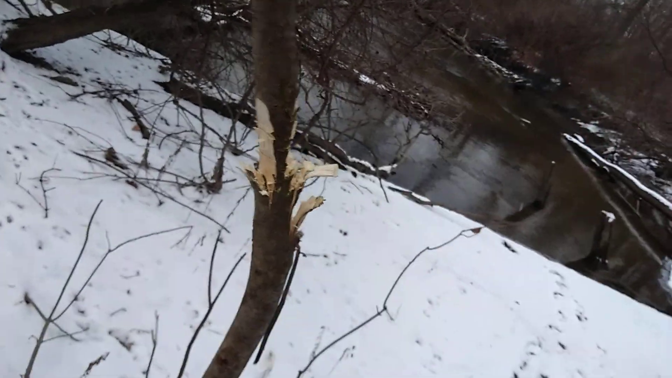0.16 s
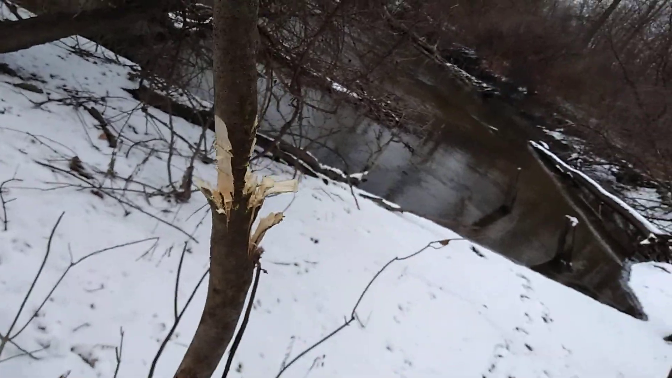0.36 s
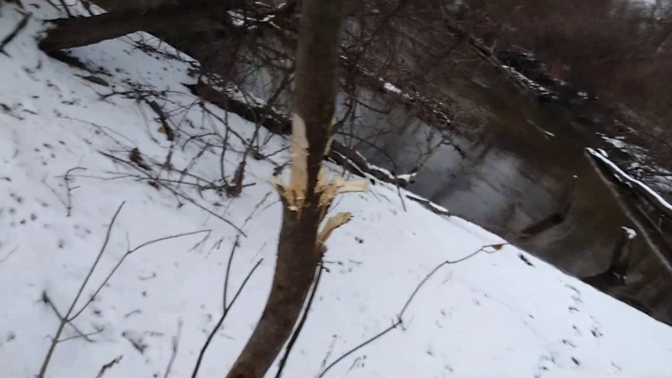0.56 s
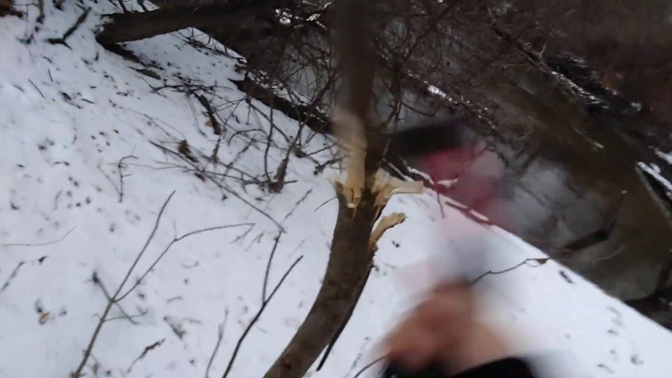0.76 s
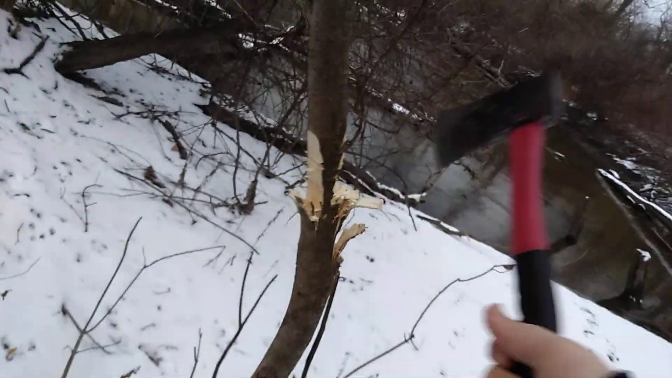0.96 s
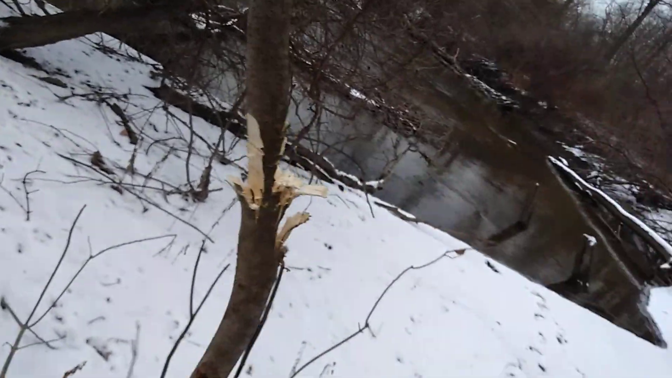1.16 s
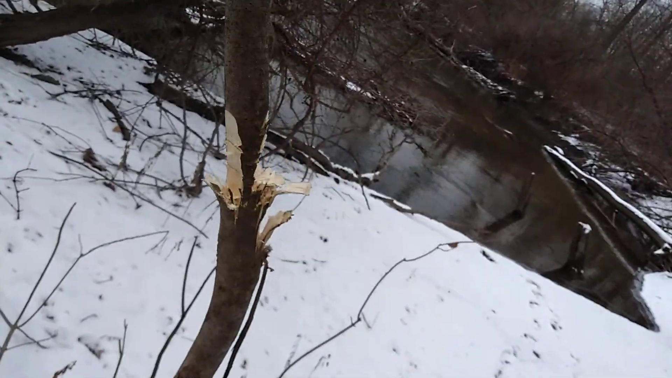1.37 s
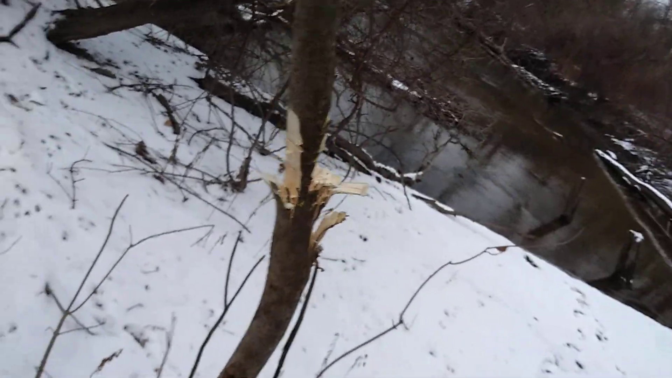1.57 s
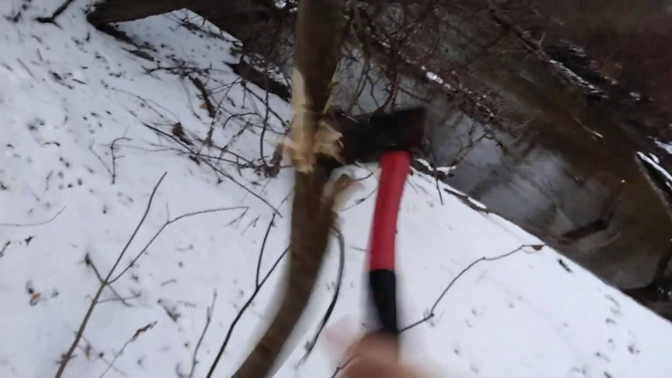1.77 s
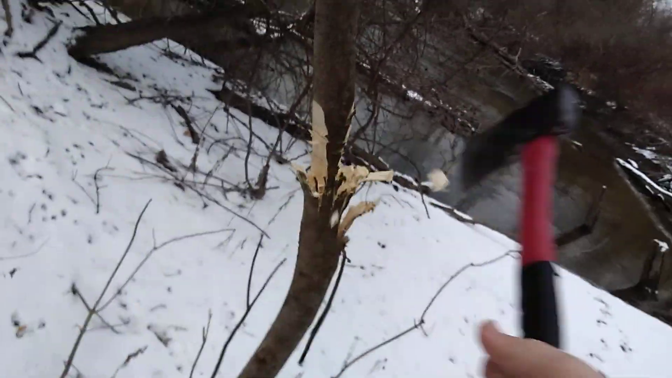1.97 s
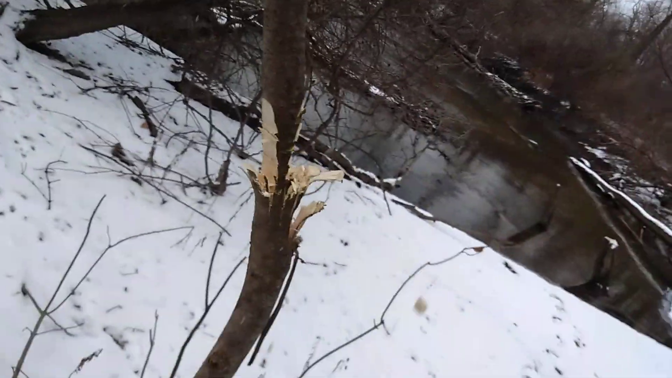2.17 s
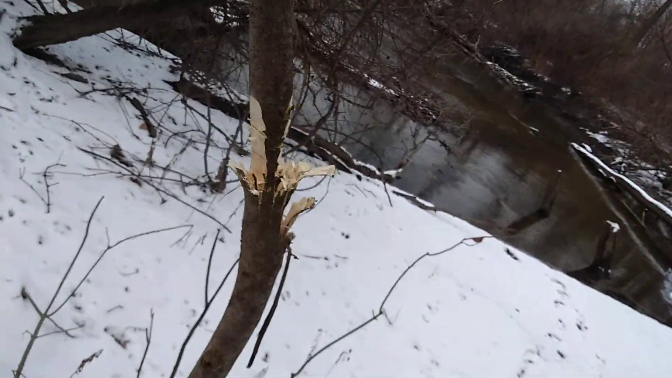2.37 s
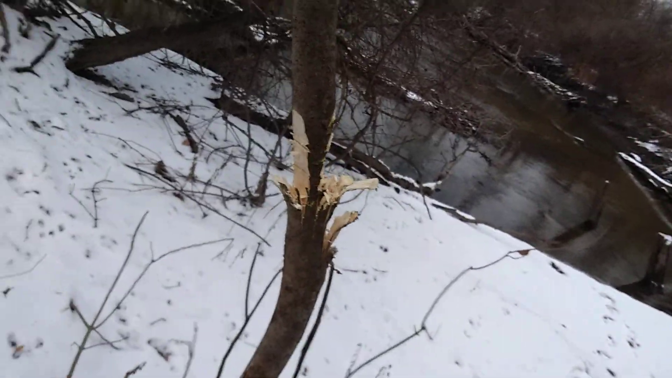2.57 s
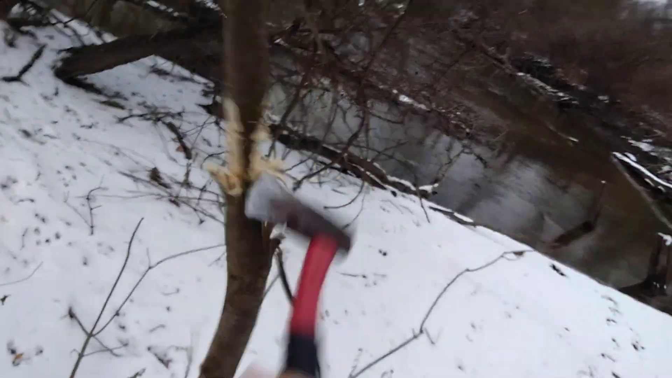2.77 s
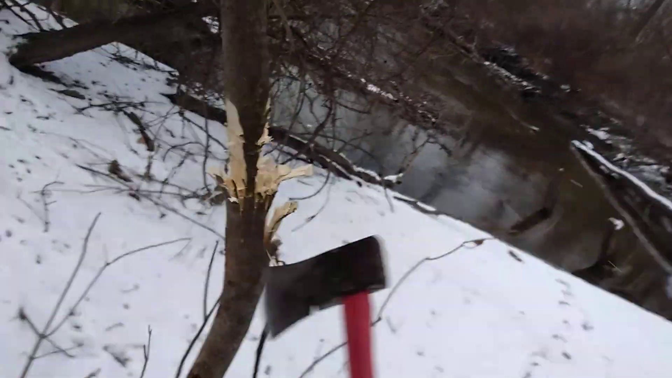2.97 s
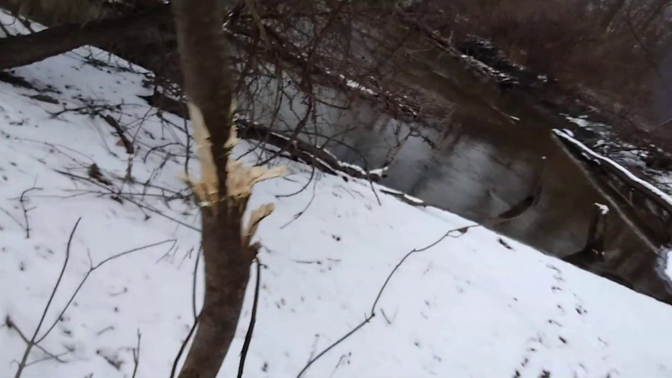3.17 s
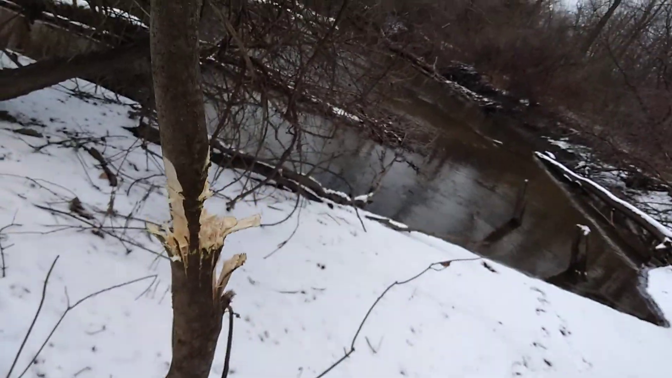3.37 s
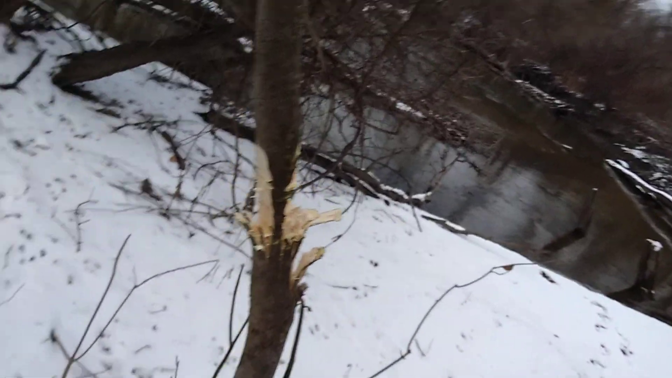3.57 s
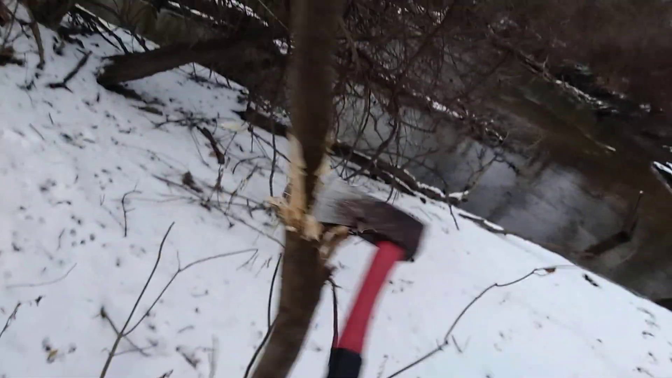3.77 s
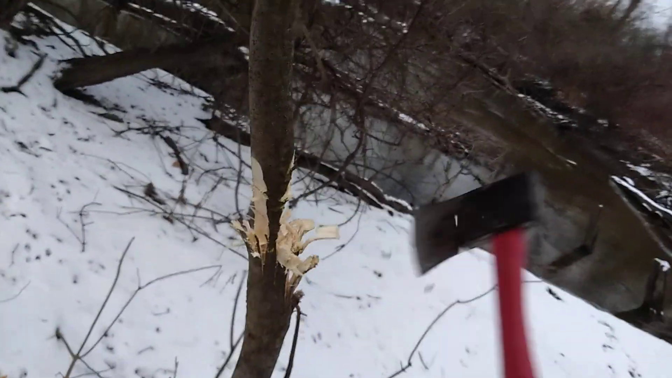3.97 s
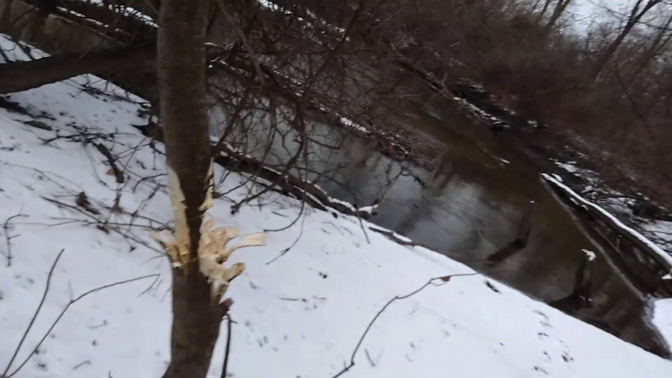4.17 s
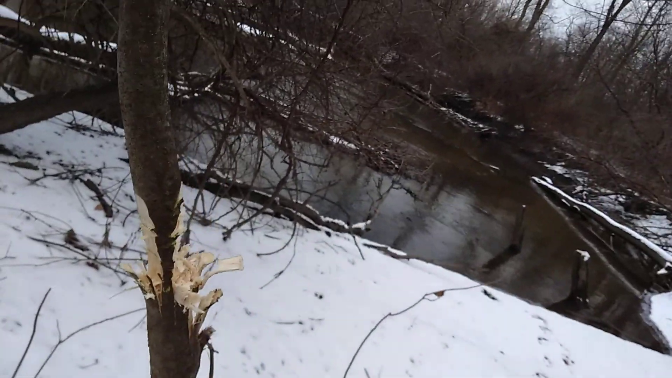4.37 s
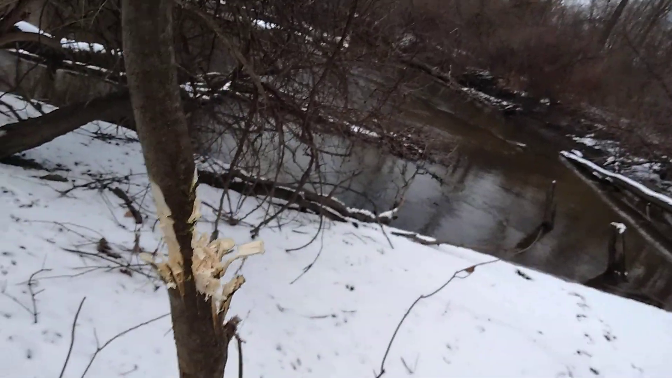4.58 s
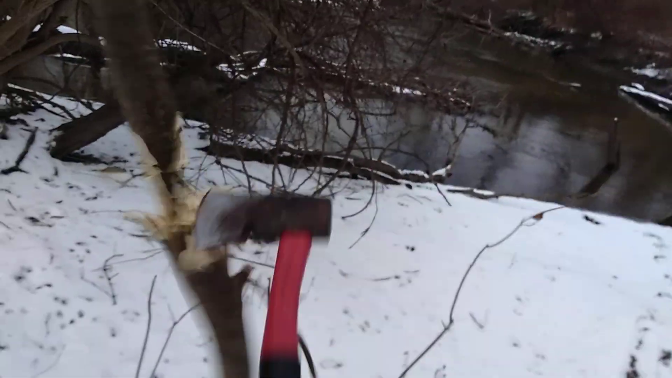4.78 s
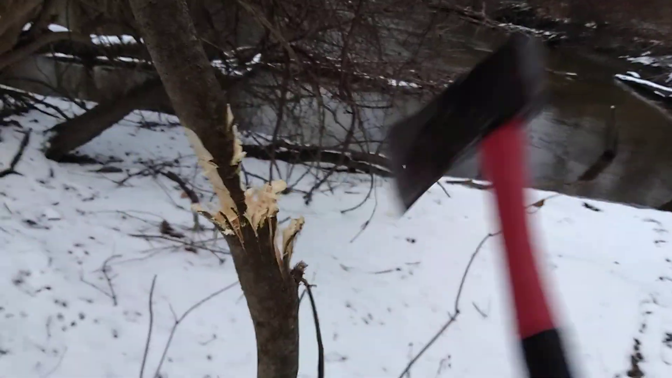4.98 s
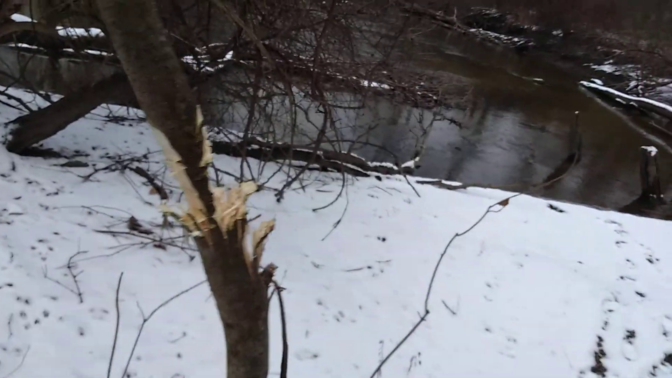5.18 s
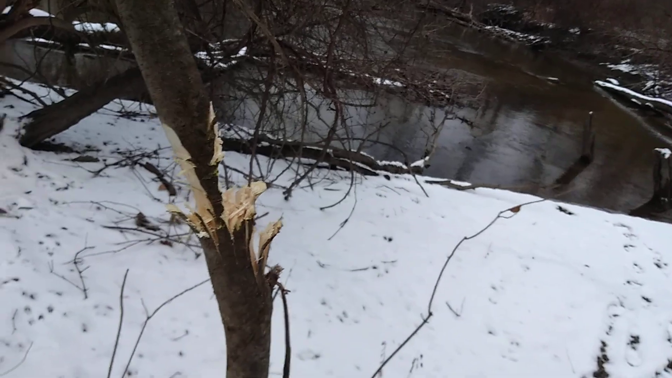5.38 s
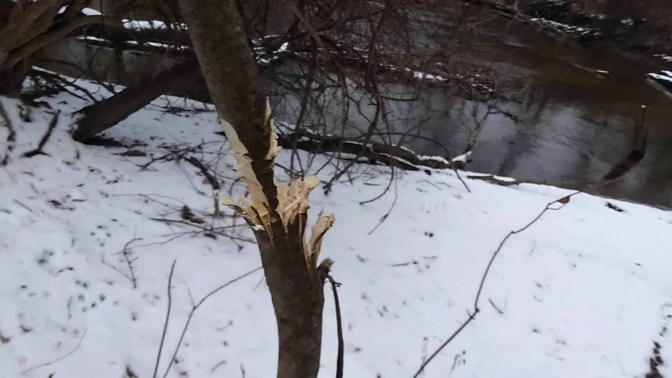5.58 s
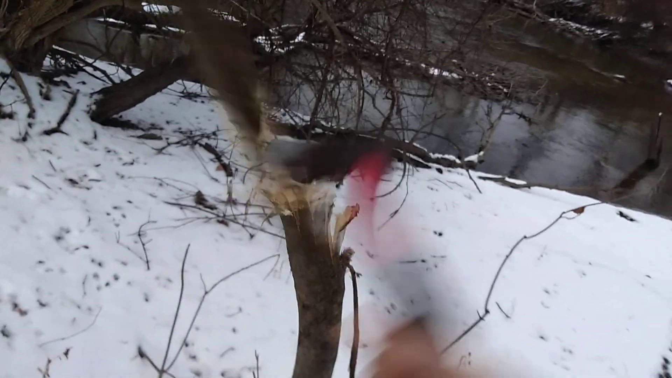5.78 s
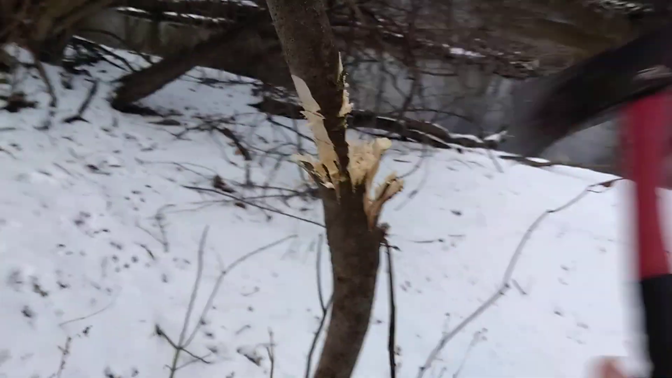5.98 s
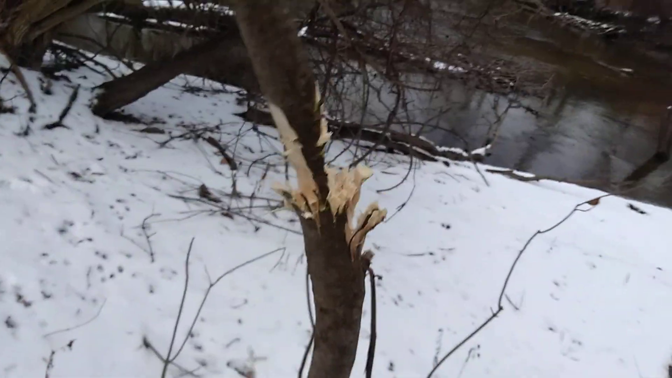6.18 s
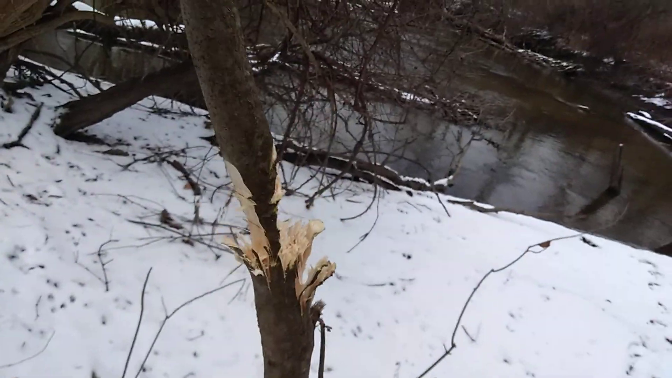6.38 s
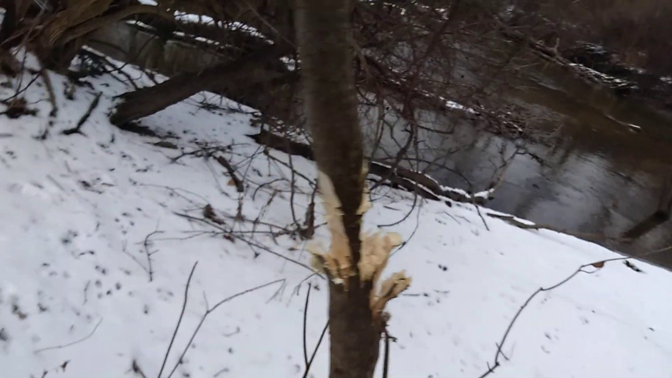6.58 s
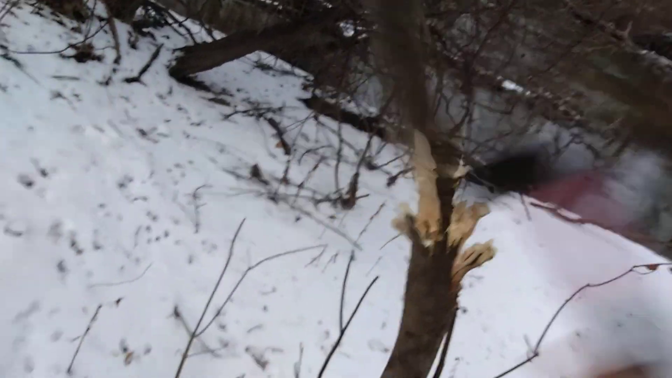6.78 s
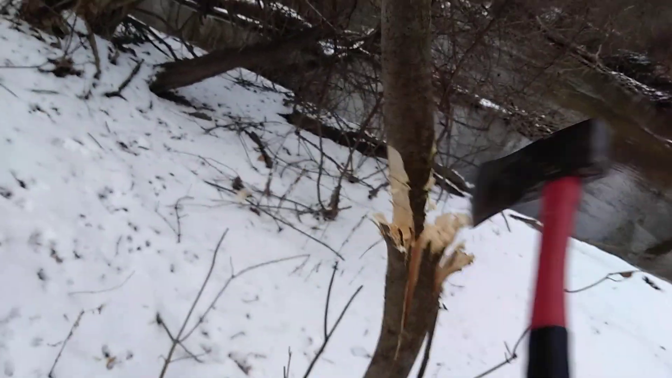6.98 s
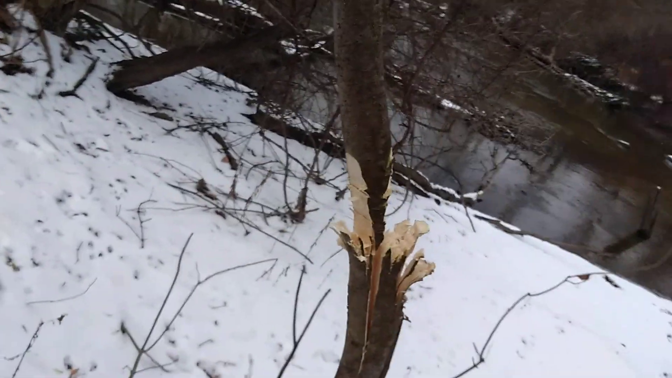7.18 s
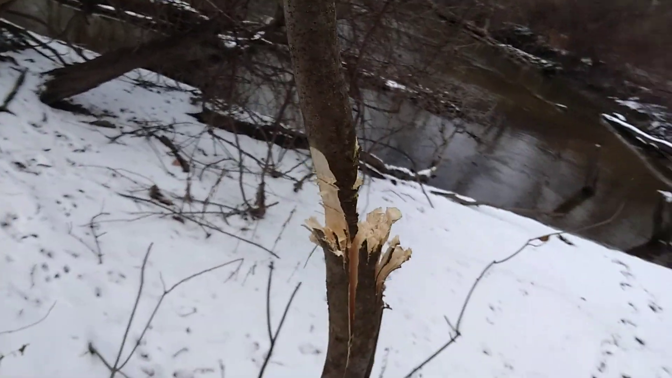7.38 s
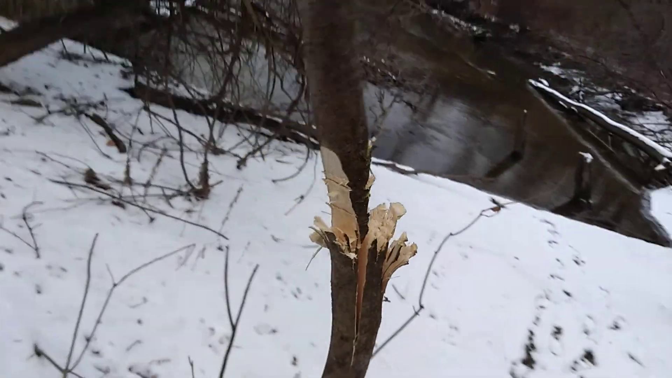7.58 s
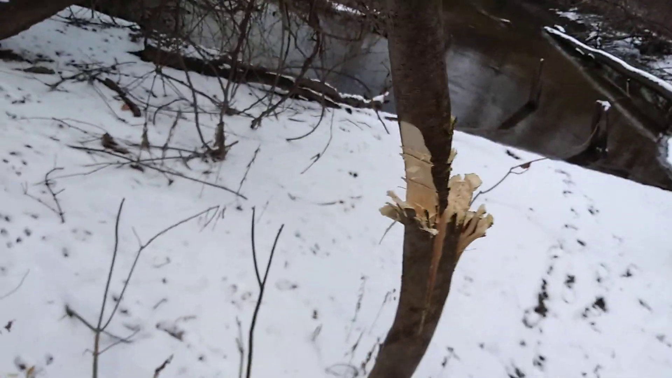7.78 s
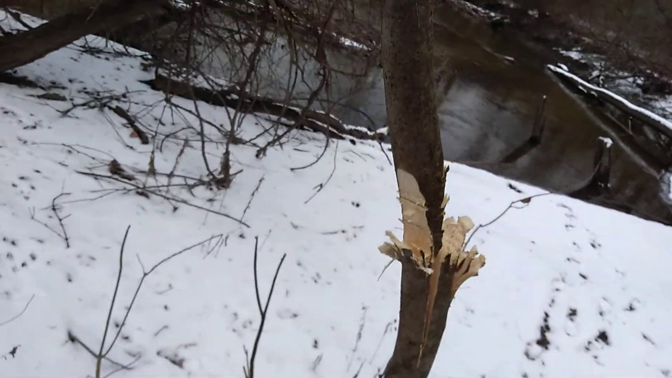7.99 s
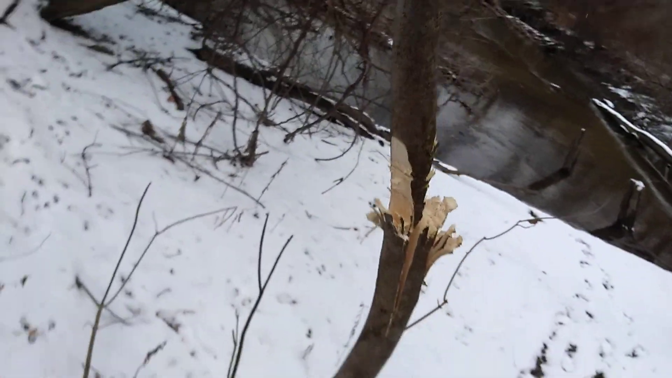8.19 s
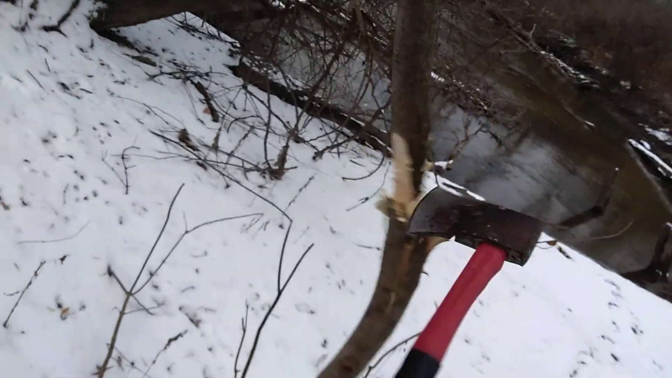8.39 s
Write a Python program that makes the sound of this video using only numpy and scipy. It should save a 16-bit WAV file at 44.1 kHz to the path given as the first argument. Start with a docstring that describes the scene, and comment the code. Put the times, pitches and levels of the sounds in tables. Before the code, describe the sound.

The tail of a chop rattles away at 0 s with a hard tick and small clacks. Hatchet blows then land at about 0.85, 1.8, 2.8, 3.8, 4.8, 5.85, 6.85 and 8.35 s, the last cut off by the end. Each is a bright, crunchy snap with a short dry trunk knock and slight low thud, heaviest at 2.8 s; the last two bite hardest. Dry branches rattle in clumps for under a second after each, with ticking twigs and chips, busiest from 2.9 to 5.5 s. Splitting cracks follow the blows from 2.8 to 6.9 s, strongest at 5.92 s, with a faint wavering steel ring. Cloth rustles softly before swings. Around 7.5-8.0 s a boot crunches snow and a sleeve sweeps. Soft low handling bumps, quiet winter air with far rumble, and a thin grainy tree echo surround the close, slightly overloaded phone pickup.

```python
"""First comes the dying rattle of a chop struck just before the start, then eight more hatchet blows.
Each blow is a burst of noise for crushed fibres, plus decaying tones for the ringing trunk and roots.
Splits crack, the dry crown rattles in clumps of noise and tiny tones, and twigs and chips tick and clack.
Filtered noise makes the rustling clothes, the boot in the snow, the hand on the phone and the winter air.
Bare trunks return a thin echo, and the two microphone ports overload softly on the loud parts."""
import sys
import numpy as np
from scipy import signal
from scipy.fft import rfft, irfft, next_fast_len
from scipy.io import wavfile

SR = 44100
rng = np.random.default_rng(int(sys.argv[2]) if len(sys.argv) > 2 else 0)


def wrap_up_sound(samples):
    """Save the sound to the file named by the first command line argument, as 16-bit audio."""
    columns = np.atleast_2d(samples).T
    # keep every value between -1 and 1, then stretch to whole-number steps
    tamed = np.clip(columns, -1, 1)
    steps = np.round(tamed * 32767).astype(np.int16)
    wavfile.write(sys.argv[1], SR, steps)


N = 371763  # samples in the scene

# Levels in the tables are relative: the functions that play them add their own overall levels.
# A t60 is the time a sound takes to fade by 60 dB.

# Hatchet blows, the first just before the start: start_s, bite_level_db, knock_level_db,
# whole_tree_heave_db, struck_slab_pitch_hz, crown_rattle_db, crown_rattle_t60_s
BLOWS = [(-.16, 0, -9, -44, 1340, -20, 0.71), (0.8481, -1.5, -11.5, -35, 1327, -26.5, 0.9),
         (1.8344, 0.5, -12, -36, 1321, -28, 0.52), (2.8198, -2.5, -13.5, -25.5, 908, -23, 0.83),
         (3.791, -1, -12, -32.5, 1289, -23.5, 0.7), (4.8296, -5, -14, -32.5, 899, -21, 0.97),
         (5.8527, -4, -12, -30.5, 1270, -20, 0.42), (6.8584, 5.5, -14, -38, 1349, -20.5, 0.42),
         (8.3468, 5.5, -22.5, -40.5, 901, -21, 0.73)]
# Tone colour of the crushed fibres: frequency_hz, level_db_per_hz
BITE_SPECTRUM = [(100, -24), (500, -6), (1200, -5), (2400, -6), (4700, 8.5), (6500, -8.5), (10000, -10.5),
                 (16000, -16.5)]
# Tone colour of the dull thud: frequency_hz, level_db_per_hz
THUD_SPECTRUM = [(20, -22), (45, -10), (65, 1.5), (110, -1.5), (180, -12), (350, -29.5), (1200, -68)]
# The trunk bends as a whole: pitch_hz, level_db, t60_s
BENDING_MODES = [(167, -2.5, 0.16), (187.3, 0, .16), (271, -8.5, 0.2)]
# The root plate rocks in the ground: pitch_hz, t60_s
ROOTS = (66, .3)


def blows(bite_db=-2, knock_db=2, thud_db=5, bend_db=12.0, roots_db=0, bite_s=.0042, thud_t60=0.23):
    """The edge crushes fibres for a few milliseconds, then trunk and roots take the blow."""
    out, t = np.zeros((2, N)), clock(.5)
    roots_hz, roots_t60 = ROOTS
    for start, bite_level, knock_level, heave, slab_hz, _, _ in BLOWS:
        crush_shape = (1 - fade(t, 0.0004)) * np.exp(-(t / bite_s) ** 2)
        bite = unit(colour(noise(len(t)), BITE_SPECTRUM)) * crush_shape
        add(out, start, undb(bite_level + bite_db) * bite)
        # the trunk's ring is slightly shorter than its free decay
        add(out, start, undb(knock_level + knock_db) * knock(.95, slab_hz))
        thud = unit(colour(noise(len(t)) * fade(t, thud_t60), THUD_SPECTRUM), size=SR // 20)
        ground = thud + rings(t, [(roots_hz, roots_db, roots_t60)], port_phase=2.0)
        bending = rings(t, BENDING_MODES)
        # the heavy parts take a moment to get moving
        slow_start = 1 - fade(t, 0.021)
        add(out, start, undb(heave) * (undb(thud_db) * ground + undb(bend_db) * bending) * slow_start)
    return out


# Clear tones of the trunk; knock() scales the t60: pitch_hz, level_db, free_t60_s
TRUNK_MODES = [(309, -15.5, 0.11), (382, -13.5, 0.071), (493, -13.5, 0.092), (661.6, -10.5, .16),
               (803.7, -7.5, 0.083), (958, -10.5, 0.079), (1339, -6.5, 0.071), (1440, -15.5, 0.14),
               (1620, -10, 0.1), (1798, -8.5, 0.16), (2407, -21.5, 0.36), (2780, -24, 0.18),
               (3180, -24, 0.28), (3840, -24.5, 0.58), (4416, -15.5, 0.15)]
# Dense ring between those tones; knock() scales the t60: frequency_hz, level_db_per_hz, free_t60_s
WOOD_BANDS = [(120, -10.5, 0.11), (248, -5, 0.18), (450, -8.5, 0.17), (780, -2, 0.17), (1400, 3.5, .09),
              (2140, -4.5, .09), (4600, -17, 0.23), (7800, -13, 0.074), (15000, -20.5, 0.042)]


def knock(length, slab_hz, modes_db=2, slab_db=0, slab_t60=.09):
    """The trunk rings: clear tones over a dense, short wooden decay; length scales all but the slab."""
    t = clock(.5)
    hz, white = np.fft.rfftfreq(len(t), 1 / SR), rfft(noise(len(t)))
    log_centres = np.log(np.array(WOOD_BANDS)[:, 0])
    dense = 0
    # overlapping bands of noise, each with its own decay
    for (_, db, t60), share in zip(WOOD_BANDS, np.eye(len(WOOD_BANDS))):
        band = np.interp(np.log(hz + 1), log_centres, share)
        band = band * hz / (hz + 150)  # less bass
        dense = dense + undb(db) * irfft(white * band) * fade(t, t60 * length)
    modes = [(pitch, db, t60 * length) for pitch, db, t60 in TRUNK_MODES]
    tones = rings(t, modes + [(slab_hz, slab_db, slab_t60)])
    return (unit(dense, size=SR // 50) + undb(modes_db) * tones) * (1 - fade(t, 0.0024))


def rings(t, modes, port_phase=1.97):
    """Decaying tones; every contact wakes them at a slightly different pitch and strength."""
    out = 0
    for hz, db, t60 in modes:
        detune, strength, phase = rng.standard_normal(3)
        cycles = hz * (1 + 0.0074 * detune) * t + phase
        angle = 2 * np.pi * cycles + np.array([[port_phase], [0]])
        out = out + undb(db + 2 * strength) * np.sin(angle) * fade(t, t60)
    return out


# The cut splits along the grain: start_s, crack_level_db, knock_level_db
SPLITS = [(2.8396, -20.5, -19.5), (3.8512, -7.5, -61.5), (3.8585, -3, -35.5), (4.8623, -0.5, -29.5),
          (4.881, -5, -36.5), (5.874, 4, -14), (5.894, 3.5, -29.5), (5.9203, 17, -19.5), (5.9325, 4.5, -46),
          (6.9255, 0.5, -24), (6.9398, -3.5, -40)]
# Tone colour of a crack: frequency_hz, level_db_per_hz
SPLIT_SPECTRUM = [(150, -7), (700, -13), (2000, 0), (4000, 6), (7000, -3), (11000, -2.5), (16000, -8.5)]


def splits(crack_db=-9, knock_db=-4, crack_t60=0.018, slab_hz=1325):
    """Fibres let go with a sharp crack that knocks the trunk again."""
    out, t = np.zeros((2, N)), clock(.5)
    for start, crack_level, knock_level in SPLITS:
        crack = unit(colour(noise(len(t)), own_colour(SPLIT_SPECTRUM, 2.4)))
        crack = crack * fade(t, crack_t60) * left_right(0, -7)
        trunk = knock(.6, slab_hz)
        add(out, start, undb(crack_level + crack_db) * crack + undb(knock_level + knock_db) * trunk)
    return out


# Tone colour of the rattling crown, also used for the echo: frequency_hz, level_db_per_hz
CROWN_SPECTRUM = [(200, -20), (600, -12.5), (1100, -10), (1600, -3), (2500, 1.5), (5000, -3), (8000, -1),
                  (11000, -2), (13000, -10), (16000, -12.5)]


def crown(rattle_db=-2.5, twig_db=-3, linger_db=-34, linger_t60=1.1, clump_db=3.0, clump_s=.025):
    """Each blow shakes the dry crown: crackle and tapping twigs come in clumps and die away."""
    out, t = np.zeros((2, N)), clock(1)
    for start, *_, db, t60 in BLOWS:
        crackling = crackle(len(t), rate=1300, spread_db=2.5, grain_t60=0.036)
        scrape = branches(len(t), CROWN_SPECTRUM) * crackling
        rattle = scrape * left_right(0, -2) + undb(twig_db) * twigs(len(t), count=300)
        turns = rng.uniform(-1, 1, size=100)
        clumps = undb(clump_db * np.interp(t / clump_s, np.arange(len(turns)), turns))
        # a quick decay with a faint, longer tail under it
        shaking = (fade(t, t60) + undb(linger_db) * fade(t, linger_t60)) * (1 - fade(t, .015))
        add(out, start, undb(db + rattle_db) * rattle * clumps * shaking)
    return out


def branches(n, spectrum, count=4, colour_db=4.0, sway_db=5.5, sway_s=.03):
    """Several rough surfaces, each with its own colour, grow louder and softer as they sway; rms 1."""
    out = 0
    for _ in range(count):
        turns = rng.standard_normal(size=800)
        sway = np.interp(np.arange(n) / SR / sway_s, np.arange(len(turns)), turns)
        out = out + colour(noise(n) * undb(sway_db * sway), own_colour(spectrum, colour_db))
    return unit(out)


def twigs(n, count, low_hz=1600, high_hz=8500, spread_db=3):
    """Many twigs tap each other, each around its own pitch; higher ones ring shorter; rms 1."""
    t = clock(.03)
    out = np.zeros((2, n + len(t)))
    for when, size, weight in rng.random((count, 3)):
        hz, i = low_hz * (high_hz / low_hz) ** size, int(when * n)
        tap = stick(t, hz, .02 * np.sqrt(low_hz / hz), scatter=.24)
        out[:, i:i + len(t)] += undb(-spread_db * np.log(weight + 0.025)) * tap
    return unit(out[:, :n])


def stick(t, hz, t60, scatter=.05):
    """A dry stick rings in a rough cluster of four tones, with different phases at each port."""
    phases = 2 * np.pi * rng.random((4, 2, 1))
    pitches = hz * (1 + scatter * rng.standard_normal(size=(4, 1, 1)))
    tones = np.sum(np.sin(2 * np.pi * pitches * t + phases), axis=0)
    return tones * fade(t, t60) * (1 - fade(t, 0.0023))


# The clearest ticks of twigs and chips: start_s, tick_peak_db, woody_body_db
TICKS = [(0.0112, -3, -32), (0.2075, -16, -47.5), (0.9191, -25.5, -32), (0.9607, -4.5, -40),
         (1.022, -20, -34), (1.1215, -10.5, -38.5), (1.4413, -29, -53.5), (1.542, -26.5, -59),
         (2.112, -16.5, -59), (2.2367, -17.5, -55.5), (2.4456, -26, -56.5), (2.5305, -32, -65),
         (2.6369, -18, -57), (2.9073, -5, -50), (2.9836, -2.5, -34.5), (3.0545, -9.5, -49),
         (3.0928, -7.5, -42), (3.1289, -13.5, -54), (3.192, -16, -50), (3.2969, -18.5, -56.5),
         (3.3897, -31.5, -65.5), (3.5123, -22.5, -62), (3.9661, 3, -36.5), (4.065, -12.5, -43.5),
         (4.1933, -7.5, -41), (4.357, -10, -48), (4.5137, -20, -53.5), (4.648, -30.5, -55.5),
         (4.9, -0.5, -28.5), (5.005, -22, -28.5), (5.0931, -3.5, -34.5), (5.1572, -13, -49.5),
         (5.2098, -15.5, -39), (5.239, -1.5, -33.5), (5.2685, -9.5, -41), (5.3147, -21, -38.5),
         (5.3737, -11, -49), (5.5364, -18.5, -46), (6.0268, 0.5, -49), (6.1118, -3, -52),
         (6.1874, -15, -50), (6.2415, -28, -52.5), (6.3617, -26.5, -52), (7.5021, -28.5, -71),
         (7.5977, -16, -44)]
# Tone colour of the hard contact: frequency_hz, level_db_per_hz
TICK_SPECTRUM = [(2000, -32), (5000, -14.5), (8000, 1), (10000, 5.5), (12500, -6.5), (16000, -15.5)]
# Tone colour of the woody body: frequency_hz, level_db_per_hz
TWIG_SPECTRUM = [(400, -23.5), (1200, -13.5), (2000, -5.5), (3200, 2), (6000, 3), (9000, -6.5),
                 (16000, -14)]


def ticks(tick_db=-6, body_db=5, bounce_s=0.0067, bounce_db=-6, tail_db=-24, tail_t60=0.18, contact_t60=.003):
    """A hard little contact, a weaker rebound just after it, and a short shiver of the twig."""
    out, t = np.zeros((2, N)), clock(0.27)
    for start, peak, body in TICKS + stray_ticks():
        since_bounce = t - bounce_s * rng.uniform(.8, 1.2)
        rebound = (since_bounce > 0) * fade(abs(since_bounce), contact_t60)
        contact = fade(t, contact_t60) + undb(bounce_db) * rebound
        grains = crackle(len(t), rate=500, spread_db=2.5, grain_t60=0.013)
        shiver = undb(tail_db) * fade(t, tail_t60) * grains
        # rough bark catches in many tiny slips of equal strength
        slips = np.sign(noise(len(t)))
        tick = colour(slips * (contact + shiver), own_colour(TICK_SPECTRUM, 0.94))
        twig_shape = contact + 2 * shiver + 0.52 * fade(t, 0.098)
        twig = colour(noise(len(t)) * twig_shape, own_colour(TWIG_SPECTRUM, 4))
        add(out, start, undb(peak + tick_db) * tick / abs(tick).max() * left_right(0, -11))
        add(out, start, undb(body + body_db) * unit(twig, size=SR // 100) * left_right(0, -2))
    return out


def stray_ticks(count=5, scatter_db=4, settle_s=.7, settle_db_per_s=44.5, peak_db=-20.5, body_db=-40):
    """Chance contacts while the tree settles, tending weaker the later they come; rows like TICKS."""
    rows = []
    for start, *_ in BLOWS:
        for k, (when, hard, woody) in enumerate(rng.random((count, 3))):
            late = settle_s * (k + when) / count
            drop = settle_db_per_s * late
            peak = peak_db - drop + scatter_db * (2 * hard - 1)
            body = body_db - drop + scatter_db * (2 * woody - 1)
            rows.append((start + late, peak, body))
    return rows


# Sticks and chips knock together: start_s, level_db, pitch_hz
CLACKS = [(0.043, -34.5, 1510), (0.079, -38, 1500), (0.126, -42.5, 1465), (1.018, -30.5, 2400),
          (1.052, -39, 1477), (3.033, -30.5, 1480), (3.285, -45.5, 793), (3.625, -46, 1990),
          (3.655, -43.5, 1850), (5.001, -30, 1360), (7.039, -43.5, 1648), (7.595, -39, 1082)]
# The axe head rings as it wrenches free: start_s, level_db, pitch_hz, t60_s
STEEL = [(5.932, -42, 1333, 0.77)]


def clacks(clack_db=-1, clack_t60=.125, stick_share=0.074, steel_width_hz=45):
    """Hollow notes of thicker sticks, and the wavering ring of the freed blade."""
    out, t = np.zeros((2, N)), clock(0.47)
    for start, db, hz in CLACKS:
        add(out, start, undb(db + clack_db) * hollow(t, hz, clack_t60, stick_share * hz))
    for start, db, hz, t60 in STEEL:
        add(out, start, undb(db) * hollow(t, hz, t60, steel_width_hz))
    return out


def hollow(t, hz, t60, width_hz):
    """A resonance fed by rough rubbing: a narrow band of noise whose level wavers as it fades."""
    bins = np.fft.rfftfreq(len(t), 1 / SR)
    resonance = 1 / (1 + ((bins - hz) / width_hz) ** 2)
    band = irfft(rfft(noise(len(t))) * resonance, len(t))
    return unit(band) * fade(t, t60) * (1 - fade(t, 0.0092)) * left_right(0, -4)


# Jacket and brushwood rustle as the arm moves; length runs up to the release: start_s, length_s, level_db
RUSTLES = [(0.617, 0.092, -54), (1.426, 0.082, -58), (1.622, 0.03, -61.5), (2.72, 0.13, -54.5),
           (3.501, .18, -56.5), (4.772, 0.045, -44), (5.509, .1, -56), (6.448, 0.043, -56),
           (6.622, 0.047, -52.5), (7.55, 0.13, -48), (8.254, 0.11, -54)]
# Tone colour of the cloth: frequency_hz, level_db_per_hz
CLOTH_SPECTRUM = [(100, -9), (400, -14.5), (800, -9), (1600, 1.5), (3500, -3.5), (6000, 5.5), (10000, -3.5),
                  (13000, -8.5), (16000, -5.5)]


def rustle(rustle_db=1, scrape_db=-5, attack_s=0.014, sag_db=-5, release_s=0.049):
    """Cloth and brushwood slide in dense small slips; each movement catches, eases and stops."""
    t, level = np.arange(N) / SR, 0
    for start, length, db in RUSTLES:
        corners = start + np.array([0, attack_s, length, length + release_s])
        level = level + undb(db) * np.interp(t, corners, [0, 1, undb(sag_db), 0])
    slips = branches(N, CLOTH_SPECTRUM, count=3, colour_db=5.5, sway_db=3.5)
    scrapes = undb(scrape_db) * twigs(N, count=1400)
    return undb(rustle_db) * level * (slips + scrapes) * left_right(2, -3)


# A sleeve sweeps across the jacket: start_s, length_s, level_db
SWEEPS = [(7.69, 0.37, -41), (7.79, 0.11, -37.5), (7.85, 0.11, -44.5)]
# Tone colour of the sliding sleeve: frequency_hz, level_db_per_hz
SLEEVE_SPECTRUM = [(150, -22), (350, -5.5), (750, -10), (1500, 5), (3300, -1), (4200, -4.5), (6000, 5),
                   (8000, 2), (10000, 1), (13000, -8), (16000, -2)]
# A boot presses the snow: start_s, length_s, level_db
STEPS = [(7.552, 0.11, -43.5), (7.585, 0.03, -34), (7.91, .08, -45.5)]
# Tone colour of the pressed snow: frequency_hz, level_db_per_hz
SNOW_SPECTRUM = [(100, -8), (300, -12), (600, -5), (1100, 4), (1800, -15), (5000, -25)]
# Low bumps of the hand on the phone: start_s, length_s, level_db
BUMPS = [(.04, .1, -38.5), (2.57, 0.074, -43.5), (3.49, 0.26, -53), (7.38, 0.27, -51), (7.67, 0.1, -47)]
# Tone colour of the soft rumble of a bump: frequency_hz, level_db_per_hz
HANDLING_SPECTRUM = [(20, -5), (40, 1.5), (65, 8), (110, -7), (170, -20), (350, -36), (1200, -68)]


def person():
    """Sliding clothes, a boot in the snow and the hand that holds the phone."""
    sleeve = presses(SWEEPS, SLEEVE_SPECTRUM) * left_right(0, -6)
    boot = presses(STEPS, SNOW_SPECTRUM)
    hand = presses(BUMPS, HANDLING_SPECTRUM)
    return rustle() + sleeve + boot + hand


def presses(table, spectrum):
    """Soft, grainy pushes: filtered crackling noise that swells and lets go."""
    level = np.zeros((1, N))
    for start, length, db in table:
        add(level, start, undb(db) * np.hanning(int(max(length, .01) * SR))[None])
    grains = noise(N) * crackle(N, rate=490, spread_db=1.0, grain_t60=0.049)
    return level * unit(colour(grains, spectrum))


def trees(x, echo_db=-27, echo_t60=0.6):
    """Bare trunks scatter a thin, grainy echo, made by convolving with fading bursts of noise."""
    t = clock(0.99)
    trunks = noise(len(t)) * crackle(len(t), rate=400, spread_db=4.5, grain_t60=0.0072)
    scatter = colour(trunks * fade(t, echo_t60) * (1 - fade(t, 0.055)), CROWN_SPECTRUM)
    scatter = scatter / np.sqrt(np.sum(scatter ** 2) / 2)  # mean energy 1 per port
    return undb(echo_db) * signal.fftconvolve(x, scatter, axes=1)[:, :N]


# Tone colour of the still air: frequency_hz, level_db_per_hz
AIR_SPECTRUM = [(20, -23), (35, -12.5), (60, -1), (110, -8), (200, -18), (300, -22), (500, -19.5),
                (850, -14.5), (1400, -22), (3000, -27.5), (6000, -31), (10000, -38), (16000, -46.5)]


def woods(air_db=-60):
    """Quiet winter air with a far rumble: steady filtered noise."""
    return undb(air_db) * unit(colour(noise(N), AIR_SPECTRUM)) * left_right(0, -1)


def crackle(n, rate, spread_db, grain_t60):
    """Envelope of many tiny fractures of very unequal size, at a mean rate per second; rms 1."""
    sizes = undb(spread_db * np.minimum(rng.exponential(size=n), 4))
    fractures = sizes * (rng.random(n) < rate / SR)
    # each fracture adds energy that drains away
    energy = signal.lfilter([1], [1, -fade(2 / SR, grain_t60)], fractures ** 2)
    return unit(np.sqrt(energy))


# Likeness of the two ports, with the bass largely in opposite phase: frequency_hz, correlation (-1 to 1)
LIKENESS = [(60, -.8), (250, -0.71), (600, -.45), (1400, 0.025), (3000, 0), (15000, -0.34)]


def noise(n):
    """White noise as the two ports share it, mixed from a common and an opposite part."""
    alike = np.clip(along(LIKENESS, np.fft.rfftfreq(n, 1 / SR)), -1, 1)
    mid, side = rfft(rng.standard_normal((2, n))) * np.sqrt([(1 + alike) / 2, (1 - alike) / 2])
    return irfft(np.array([mid + side, mid - side]), n)


def own_colour(points, spread_db):
    """No two contacts sound alike: a spectrum with random peaks and dips."""
    hz = np.geomspace(300, 16000, 36)
    return np.column_stack([hz, along(points, hz) + spread_db * rng.standard_normal(len(hz))])


def colour(x, points, size=4096):
    """Causal filter with the given spectrum, built from the cepstrum of its log gain."""
    gain = undb(along(points, np.fft.rfftfreq(size, 1 / SR)))
    cepstrum = irfft(np.log(gain))
    # fold the second half onto the first so that the filter responds without delay
    cepstrum[1:size // 2] *= 2
    cepstrum[size // 2 + 1:] = 0
    response = irfft(np.exp(rfft(cepstrum)))
    return signal.fftconvolve(x, response[None], axes=1)[:, :x.shape[1]]


def along(points, hz):
    """Read the second column of a table on a log-frequency axis."""
    table = np.array(points, float)
    return np.interp(np.log(hz + 1), np.log(table[:, 0]), table[:, 1])


def undb(db):
    """Decibels to gain."""
    return 10 ** (np.asarray(db) / 20)


def left_right(left_db, right_db):
    """One gain for each port, from decibels."""
    return undb([[left_db], [right_db]])


def unit(x, size=None):
    """Scale to rms 1, over all of it or over its first samples."""
    return x / np.sqrt(np.mean(x[..., :size] ** 2))


def fade(t, t60):
    """Exponential decay by 60 dB in t60 seconds."""
    return np.exp(-np.log(1000) * t / t60)


def clock(seconds):
    """Sample times of a short sound, rounded up to a length that transforms fast."""
    return np.arange(next_fast_len(int(seconds * SR))) / SR


def add(out, start, x):
    """Mix a sound in at its start in seconds, cutting off what lies outside the scene."""
    i = int(start * SR)
    x, i = x[:, max(-i, 0):], max(i, 0)
    out[:, i:i + x.shape[1]] += x[:, :max(N - i, 0)]


def scene():
    """Chopping and its echo, the shaken crown, the person and the still woods."""
    chopping = blows() + splits() + ticks() + clacks()
    return chopping + trees(chopping) + crown() + person() + woods()


# Tone colour of the left port: frequency_hz, gain_db
LEFT_PORT = [(100, 2), (500, 4), (1200, 0.5), (3500, 0.5), (6500, 3), (8300, 6.5), (9800, 15.5), (11200, 9),
             (13000, 8), (16000, -1)]
# Tone colour of the right port: frequency_hz, gain_db
RIGHT_PORT = [(100, 1.5), (500, 1.5), (1200, -5.5), (3500, -1), (6500, 0.5), (8300, -2), (10000, -5),
              (12500, -5.5), (16000, -4.5)]


def record(dry, ceiling=0.83, top_hz=16200):
    """The left port is strong near 10 kHz, the right is dull; both overload softly, then lose the top."""
    ports = np.vstack([colour(dry[:1], LEFT_PORT), colour(dry[1:], RIGHT_PORT)])
    clipped = ceiling * np.tanh(ports / ceiling)
    low_pass = signal.ellip(10, .2, 70, top_hz, fs=SR, output="sos")
    return signal.sosfilt(low_pass, clipped)


dry = scene()
out = record(dry)
wrap_up_sound(out)
```